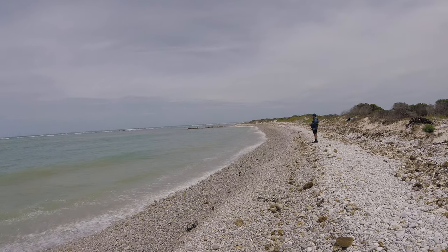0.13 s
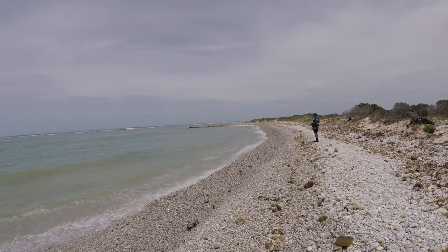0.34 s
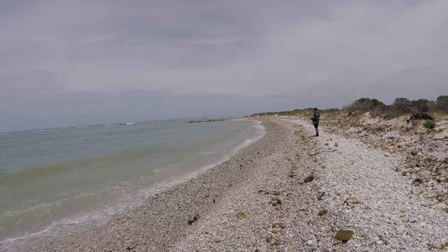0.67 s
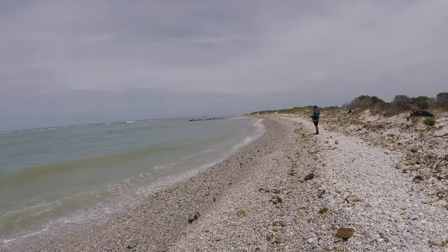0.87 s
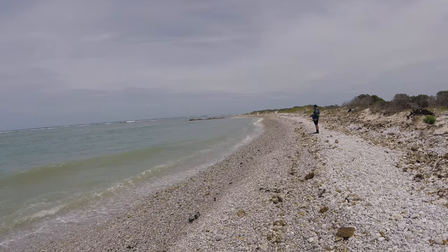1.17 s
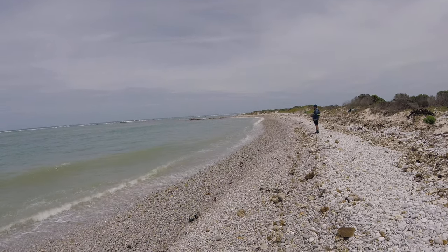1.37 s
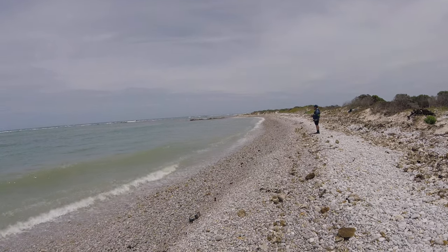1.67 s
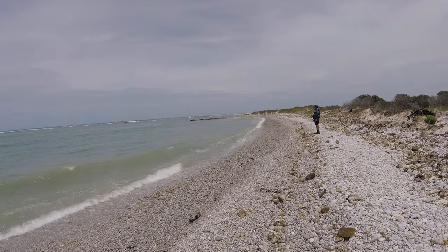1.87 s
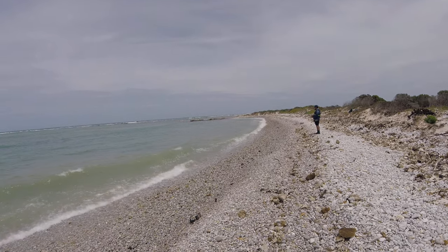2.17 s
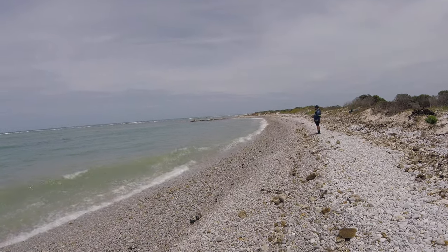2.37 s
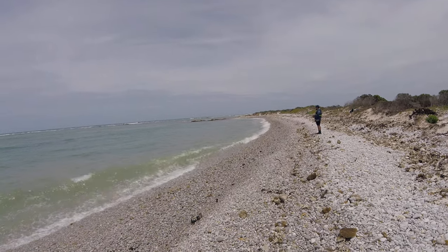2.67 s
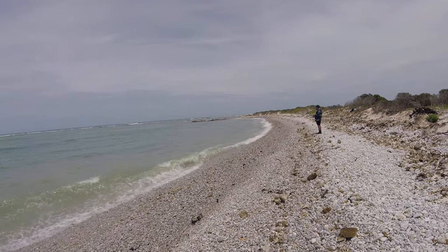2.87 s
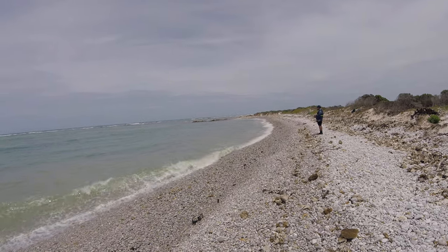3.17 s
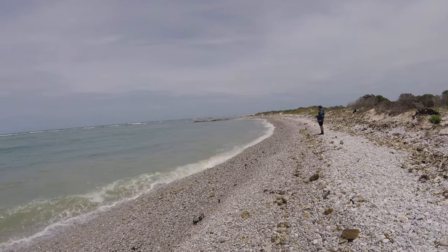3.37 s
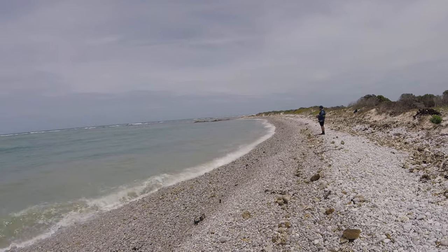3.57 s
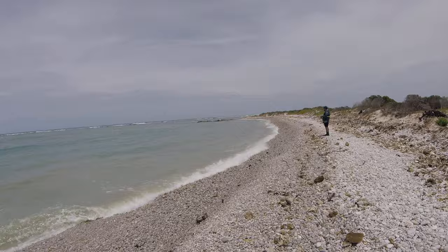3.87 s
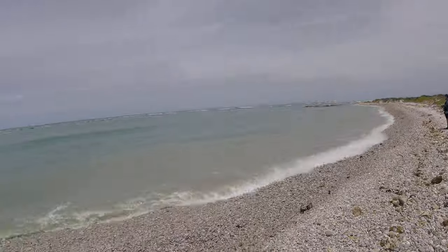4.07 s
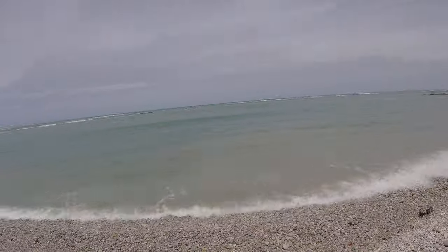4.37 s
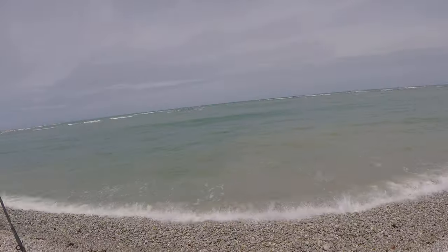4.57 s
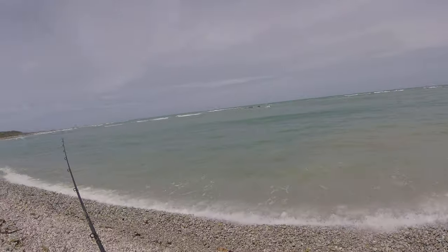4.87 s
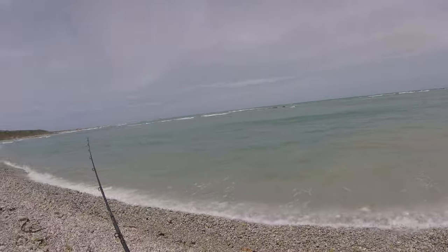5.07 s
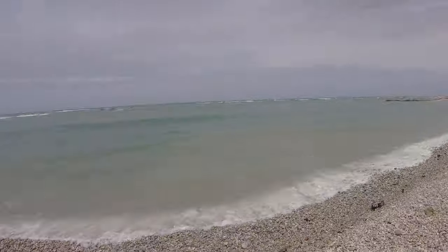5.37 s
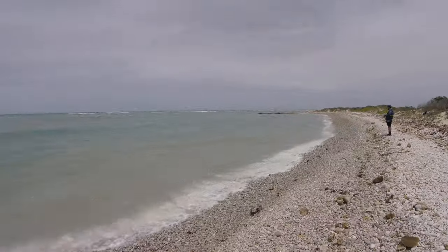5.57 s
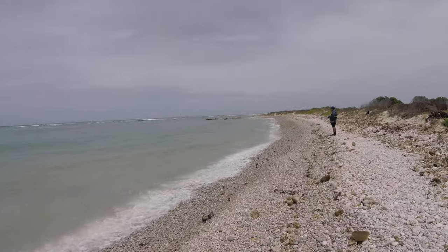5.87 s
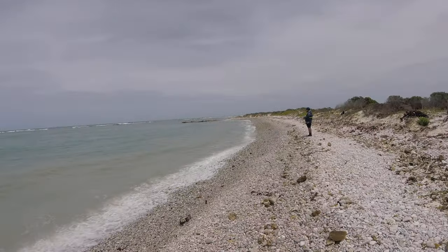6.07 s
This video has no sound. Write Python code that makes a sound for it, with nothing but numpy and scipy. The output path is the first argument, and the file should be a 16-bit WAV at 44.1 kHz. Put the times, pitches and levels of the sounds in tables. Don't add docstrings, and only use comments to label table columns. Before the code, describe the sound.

Wind dominates, pressing on the microphone with deep rumble, throb and rough flutter, plus sudden dull slaps. Beneath it, a small wave breaks further along a pebble beach, with wet stones knocking together. A larger wave then foams up close, roaring softly, and drains back with thin hissing. Near the end the wind slaps hardest. Open outdoor shore, with a slightly ringing, enclosed microphone.

```python
import sys
import numpy as np
from scipy import signal
from scipy.fft import rfft, irfft, next_fast_len
from scipy.io import wavfile
from scipy.ndimage import uniform_filter1d

SR = 44100
rng = np.random.default_rng(int(sys.argv[2]) if len(sys.argv) > 2 else 0)


def waveform_to_disk(signal):
    frames = np.transpose(np.atleast_2d(signal))
    scaled = np.clip(frames, -1, 1) * 32767
    samples = np.round(scaled).astype(np.int16)
    wavfile.write(sys.argv[1], SR, samples)


def boost_factor(decibels):
    exponent = np.asarray(decibels, float) / 20
    return 10 ** exponent


N = 274344

# [f/Hz, level/dB per Hz]
HISS_SPECTRUM = [(2500, -10), (5000, -3.5), (7200, -2), (8500, -7), (11000, -14), (14000, -13),
                 (15000, -20), (16000, -32)]

# [t/s, level/dB, backwash/0-1]
SURF_ROAR = [(0.0, -45.5, 0.26), (.1, -46.5, .01), (.36, -38.5, 0.22), (.6, -41, 0), (.83, -37.5, .01),
             (1.05, -34, 0.2), (1.3, -33, 0.23), (1.71, -25.5, 0.98), (2.45, -37.5, 0.36), (2.75, -40, .01),
             (3.1, -36.5, 0.25), (3.57, -32.5, 0.13), (3.9, -26.5, 0.16), (4.24, -25, 0), (4.81, -20, 0.62),
             (5.18, -25, 0.86), (5.6, -35, 1), (6.22, -31.5, 0.7)]
# [t/s, level/dB]
FOAM_AMOUNT = [(0.0, -72.5), (.36, -64.5), (.7, -63), (1.1, -56), (1.3, -50.5), (1.71, -44.5), (2.6, -48),
               (2.87, -45), (3.08, -45), (3.2, -39.5), (3.57, -40), (3.74, -35), (4.07, -35.5),
               (4.24, -28.5), (4.81, -33.5), (5.18, -45), (5.47, -56.5), (6.22, -56.5)]
# [t/s, nearness/0-1]
NEARNESS = [(.3, .01), (1.2, 0.19), (1.3, 0.38), (2.9, 0), (3.3, 0.4), (3.8, 1), (4.45, 0.91), (5.5, 0.97),
            (6.22, 1)]
# [t/s,
# lift/dB]
HOLLOW_SLAPS = [
    (1.32, 11),
    (2.94, -7.5),
    (3.2, 1),
    (4.31, -4),
    (5.96, 9),
]
# [f/Hz, level/dB per Hz]
ROAR_SPECTRUM = [(150, 1), (250, 0.5), (866, -5), (944, -6), (1150, -6), (1670, -13), (2160, -14),
                 (2790, -21.5), (3110, -23.5), (4170, -31), (4600, -33), (5980, -49), (10100, -120)]
# [f/Hz, level/dB per Hz]
FIZZ_SPECTRUM = [(2000, -24), (3000, -3), (4200, -7.5), (4600, -4), (4950, 2.6), (6250, 0.7), (6700, -7.5),
                 (8500, -11), (10500, -13.5), (11200, -21), (12000, -35.5), (13000, -25), (13900, -28.5),
                 (15100, -34.5)]
# [t/s, peak level/dB, f/Hz, ring/s]
STONE_KNOCKS = [(.378, -26.5, 1770, .015), (.449, -21, 1940, 0.013), (.483, -28, 2500, 0.017),
                (0.522, -22, 1340, .015), (.632, -33.5, 1900, .012), (.84, -25, 2000, 0.021),
                (0.904, -19.5, 1855, 0.014), (0.974, -33, 3970, 0.014), (1.025, -19.5, 1800, 0.013),
                (1.311, -22, 1230, 0.064), (1.35, -18, 1200, 0.03), (1.505, -21, 1070, 0.033),
                (1.864, -20.5, 1906, 0.024), (2.132, -25, 2250, .015), (3.526, -23.5, 1580, 0.017),
                (5.647, -46, 2500, .012), (5.801, -37.5, 5200, .01), (5.952, -23, 1830, 0.013),
                (6.087, -36.5, 4170, .01), (6.15, -40.5, 5340, .01), (6.188, -36, 4800, 0.0087)]

# [t/s, level/dB]
WIND_STRENGTH = [(0.0, -3.5), (.2, -1), (.45, 1), (.8, -0.5), (1.0, -5), (1.25, 1.5), (1.9, 3), (2.05, 0),
                 (2.3, 1.5), (2.85, 2), (3.12, -1), (3.3, 3.5), (3.68, 0.5), (3.9, 6), (4.7, -6.5),
                 (5.1, -1), (5.55, -0.5), (6.22, 4)]
# [t/s, lift/dB, fineness/0 big-1
# middle-2 small and above finer, half length/s]
PORT_EDDIES = [(0.411, 10, 0.14, 0.16), (0.473, 12, 1.4, 0.024), (0.663, 10.5, .6, .025),
               (0.854, 10.5, .05, 0.072), (1.078, 14.5, 1.1, 0.042), (1.221, 8.5, .6, 0.047),
               (1.31, 6, 0.95, 0.053), (1.407, 5, .05, 0.025), (1.584, 8, 0.13, .05),
               (1.728, 10, 0.26, 0.048), (1.905, 5.5, 0.15, 0.11), (2.12, 8.5, 1.35, 0.092),
               (2.303, 13.5, 0.4, 0.037), (2.38, 3, 0.042, .03), (2.424, 11, 0.43, 0.02),
               (2.499, 9.5, .05, 0.026), (2.681, 8, 0.297, 0.118), (2.956, 9.5, 0.87, 0.017),
               (3.035, 6, 0.37, 0.15), (3.209, 13.5, 1.0, 0.014), (3.717, 6.5, .05, 0.022),
               (3.91, 7.5, 0.81, 0.066), (4.43, 6, 0.49, 0.097), (4.699, 9.5, 0.52, .04),
               (4.844, 10.5, 0.59, 0.094), (5.168, 8.5, 0.92, 0.059), (5.284, 5, .05, 0.034),
               (5.307, 9.5, 0.59, 0.022), (5.604, 5.5, 0.85, 0.15), (6.003, 8, 0.23, 0.2),
               (-0.004, 13.5, 1.04, 0.046), (0.18, 9, 0.29, 0.05), (0.716, -3, 1.65, .025),
                (.78, 3.5, 1.3, 0.052), (.96, -7, 1.9, 0.04), (1.475, 2.5, 2.48, 0.025),
                (1.871, 10.5, 2.6, 0.049), (2.035, -10, .05, 0.029), (2.533, -2, .8, .03),
                (3.237, 4.5, .1, 0.066), (3.456, 2.5, 1.1, 0.12), (3.606, 3.5, 0.99, 0.056),
                (4.045, 6, .6, 0.045), (4.605, -2, 0.48, .04), (4.93, 4, 0.61, 0.049),
                (5.05, 0.5, 0.62, .04), (5.547, -22, 0.56, 0.0184), (5.752, 4.5, 2.1, 0.024),
                (5.885, -4.5, 0.55, 0.017), (6.05, 3, 2.7, .02), (6.08, 3, 1.8, 0.024),
                (6.17, 3, 1.3, 0.022)]
# [f/Hz, level/dB per Hz]
RUMBLE_SPECTRUM = [(7.1, -18), (12, -0.5), (32, 14), (62, -1), (81, -46), (140, -120)]
THROB_SPECTRUM = [(36, -48), (62, 4), (135, -10.5), (180, -42), (300, -120)]
FLUTTER_SPECTRUM = [(82, -7.5), (140, -1), (427, -20.5), (564, -22.5), (759, -30.5), (935, -34),
                    (1040, -52), (1980, -52.5), (9000, -92), (11700, -107), (19800, -120)]
# [t/s, peak level/dB, length/s, tearing/dB]
PORT_BUFFETS = [(0.012, -27.5, 0.0079, 3.5), (0.177, -29, 0.012, -1), (0.245, -20, 0.0192, -9),
                (0.321, -14, 0.013, -14.5), (0.368, -20.5, 0.0064, 4), (0.422, -13, 0.0099, -17),
                (0.45, -21.5, 0.0173, -2), (0.516, -18.5, 0.015, -7), (0.578, -21, 0.0056, -2),
                (0.636, -19, 0.017, -24.5), (0.648, -43, 0.0135, -1.5), (0.673, -11, 0.0086, -10),
                (1.555, -25, 0.015, -17.5), (2.159, -19.5, 0.0073, -22), (2.257, -16.5, 0.028, -24.5),
                (2.327, -14, 0.0147, -19), (2.335, -6, 0.011, -27), (2.673, -18.5, 0.0074, -21),
                (2.944, -23.5, 0.021, 2.5), (3.196, -9, 0.016, -10.5), (3.302, -16, 0.039, -25),
                (5.884, -4.5, 0.01, -10), (5.929, -11, 0.018, -30.5), (5.954, -4.5, 0.0099, -9),
                (5.981, -9.5, 0.0165, -9), (6.01, -6, 0.012, -25), (6.038, -11.5, 0.0096, -9),
                (6.054, -7.5, 0.0075, -21), (6.143, -7, 0.022, -16)]

# [t/s, half length/s, lower edge f/Hz, depth level/dB]
TREBLE_DIPS = [
    (3.863, .005, 6900, -26),
    (3.863, .005, 3500, -7),
    (4.821, .0045, 6900, -22),
    (4.821, .005, 3700, -8),
    (5.078, .0055, 6300, -16),
    (5.078, .007, 3300, -17),
]


def in_time(rows):
    s, *columns = np.transpose(rows)
    return [np.interp(np.arange(N) / SR, s, c) for c in columns]


def bumps(rows):
    t = np.arange(0, N + 32, 32) / SR
    total = sum(db * np.exp(-((t - s) / half) ** 2) for s, db, half in rows)
    return np.interp(np.arange(N) / SR, t, total)


def rms_one(x):
    return x / np.sqrt(np.mean(x ** 2) + 1e-20)


def evened(x, span_s, share):
    level = np.sqrt(uniform_filter1d(x ** 2, int(span_s * SR)) + 1e-3)
    return rms_one(x / level ** share)


def drift(rate_hz):
    r = np.exp(-40 * np.pi * rate_hz / SR)
    noise = rng.standard_normal(N // 20 + 2002)
    slow = signal.lfilter([1], [1, -2 * r, r * r], noise)[2000:]
    return np.interp(np.arange(N) / 20, np.arange(len(slow)), rms_one(slow))


def grains(per_s, spread_db):
    sizes = boost_factor(spread_db * np.minimum(rng.exponential(1, N), 5))
    sizes = sizes * rng.choice([-1, 1], N)
    return rms_one(sizes * (rng.random(N) < per_s / SR))


def coloured(source, spectrum, count, gain_db):
    size = next_fast_len(N)
    spectrum_hz, spectrum_db = np.transpose(spectrum)
    log_hz = np.log(np.maximum(np.arange(size // 2 + 1) * SR / size, 1))
    colour_db = np.interp(log_hz, np.log(spectrum_hz), spectrum_db, left=-120, right=-120)
    lines = rfft(source, size) * boost_factor(colour_db)
    lines = lines / np.std(irfft(lines, size))
    centres = np.geomspace(spectrum_hz[0], spectrum_hz[-1], count)
    out = np.zeros(N)
    for k, hz in enumerate(centres):
        share = np.interp(log_hz, np.log(centres), np.arange(count) == k)
        out += irfft(lines * share, size)[:N] * boost_factor(gain_db(hz))
    return out


def microphone_hiss():
    return coloured(rng.standard_normal(N), HISS_SPECTRUM, count=3,
                    gain_db=lambda hz: -62.5 + 1.5 * drift(8.0))


def surf_levels():
    roar_db, backwash = in_time(SURF_ROAR)
    foam_db, = in_time(FOAM_AMOUNT)
    near, = in_time(NEARNESS)
    slap_db = bumps([(s, db, 0.008) for s, db in HOLLOW_SLAPS])
    low_db = -1 + 6.5 * near - 13 * backwash - slap_db
    rattle_db = 6 - 10.5 * backwash - slap_db
    thinness_db = np.maximum(-43 - foam_db, 0)
    spray_db = -3.5 + 4.5 * near + 0.5 * thinness_db * (0.6 - 0.2 * near)
    air_db = -2 * (1 - near ** 2)
    ticks = 0.45 * backwash * near
    return roar_db + slap_db, low_db, rattle_db, foam_db, spray_db, air_db, ticks


def surf():
    roar_db, low_db, rattle_db, fizz_db, spray_db, air_db, ticks = surf_levels()
    surge = 0.1 * drift(32.0) + 0.5 * drift(38.0)

    def roar_gain_db(hz):
        low = low_db / (1 + (hz / 600) ** 4)
        rattle = rattle_db / (1 + (1650 / hz) ** 6)
        return low + rattle + 1.7 * surge + 1.08 * drift(15.6)

    def fizz_gain_db(hz):
        spray = spray_db / (1 + (7000 / hz) ** 8)
        air = air_db * (hz / 11100.0) ** 2
        return spray + air + 0.88 * surge + 0.5 * drift(8.0)

    churn = 0.91 * rng.standard_normal(N) + 0.47 * grains(per_s=1200.0, spread_db=2.5)
    roar = coloured(churn, ROAR_SPECTRUM, count=9, gain_db=roar_gain_db)
    foam = 1.2 * rng.standard_normal(N) + 0.2 * grains(per_s=4000.0, spread_db=5.0)
    foam = foam + ticks * grains(per_s=45.0, spread_db=3.0)
    fizz = coloured(foam, FIZZ_SPECTRUM, count=8, gain_db=fizz_gain_db)
    return boost_factor(roar_db + 3.5) * roar + boost_factor(fizz_db + 2.5) * fizz


def stones():
    out = np.zeros(N + SR)
    t = np.arange(SR // 10) / SR
    for s, peak_db, hz, ring_s in STONE_KNOCKS:
        contact = 1 - np.exp(-(t * hz * 1.7) ** 2)
        band = signal.butter(2, [0.6 * hz, 1.15 * hz], "band", fs=SR, output="sos")
        crack = rms_one(signal.sosfilt(band, rng.standard_normal(len(t))))
        knock = boost_factor(-4.0 - 60 * t / 0.014) * crack
        for ratio, mode_db in zip((1, 0.72, 1.45), (-2.5, -7, -8)):
            mode_hz = hz * ratio * (1 + 0.099 * rng.standard_normal())
            decay = boost_factor(mode_db - 60 * t * ratio / ring_s)
            knock = knock + decay * np.sin(2 * np.pi * mode_hz * t)
        at = round(s * SR)
        out[at:at + len(t)] += boost_factor(peak_db) * knock * contact
    return out[:N]


def eddy_lift(size):
    reach = 0.9
    return bumps([(s, db * np.exp(-((size - fine) / reach) ** 2), half)
                  for s, db, fine, half in PORT_EDDIES])


def wind_levels():
    steady, = in_time(WIND_STRENGTH)
    stirred = bumps([(s, 0.61 * (db + 35.5), 0.019) for s, db, *_ in PORT_BUFFETS])
    stirred = np.minimum(stirred, 9.0)
    rumble_db = -23.5 + 0.15 * steady + eddy_lift(0)
    throb_db = -24.5 + 0.133 * steady + eddy_lift(1) + 0.35 * stirred
    flutter_db = -28 + steady + eddy_lift(2) + stirred
    return rumble_db, throb_db, flutter_db


def wind():
    rumble_db, throb_db, flutter_db = wind_levels()
    lumps = 2.2 * drift(20.0) + 2.4 * drift(70.0)
    rumble = coloured(rng.standard_normal(N), RUMBLE_SPECTRUM, count=1,
                      gain_db=lambda hz: 0.28 * drift(5.5))
    throb = coloured(rng.standard_normal(N), THROB_SPECTRUM, count=1,
                     gain_db=lambda hz: 1.67 * lumps)
    flutter = coloured(rng.standard_normal(N), FLUTTER_SPECTRUM, count=7,
                       gain_db=lambda hz: lumps * (hz / 300) ** 0.15 + 2 * drift(12.0))
    rumble = evened(rumble, span_s=0.064, share=0.58)
    throb = evened(throb, span_s=0.028, share=0.51)
    flutter = evened(flutter, span_s=0.069, share=0.65)
    return boost_factor(rumble_db + 1.1) * rumble + boost_factor(throb_db + 1.3) * throb + boost_factor(flutter_db + 1.0) * flutter


def buffets():
    out = np.zeros(N + SR)
    t = np.arange(SR // 8) / SR
    rise = 1 - np.exp(-(t / 0.00101) ** 2)
    body_band = signal.butter(3, [95, 540], "band", fs=SR, output="sos")
    edge_band = signal.butter(3, [480, 860], "band", fs=SR, output="sos")
    for s, peak_db, length_s, tear_db in PORT_BUFFETS:
        noise = rng.standard_normal(SR // 4)
        body = evened(signal.sosfilt(body_band, noise)[-len(t):], span_s=0.0024, share=0.29)
        edge = evened(signal.sosfilt(edge_band, noise)[-len(t):], span_s=0.0024, share=0.29)
        age = t / length_s
        burst = body * np.exp(-age) + boost_factor(tear_db + 9.5) * edge * np.exp(-(3.4 * age) ** 2)
        at = round(s * SR)
        out[at:at + len(t)] += boost_factor(peak_db - 6.0) * rise * burst
    return out[:N]


def scene():
    return (microphone_hiss() + surf() + stones() + wind() + buffets())[None]


def low_pass(x):
    return signal.sosfilt(signal.butter(12, 15180, fs=SR, output="sos"), x)


def record(dry):
    mix = 0.869 * np.tanh(dry / 0.86)
    mix *= 1 - 0.9 * np.exp(-np.arange(N) / SR / 0.004)
    t = np.arange(-2048, 2048) / SR
    line_hz = np.arange(2049) * SR / 4096
    for s, half_s, edge_hz, depth_db in TREBLE_DIPS:
        at = round(s * SR)
        around = slice(at - 2048, at + 2048)
        treble = irfft(rfft(mix[:, around]) * (line_hz > edge_hz))
        dip = boost_factor(depth_db * np.exp(-(t / half_s) ** 2))
        mix[:, around] -= treble * (1 - dip)
    return low_pass(mix)


dry = scene()
out = record(dry)
waveform_to_disk(out)
```